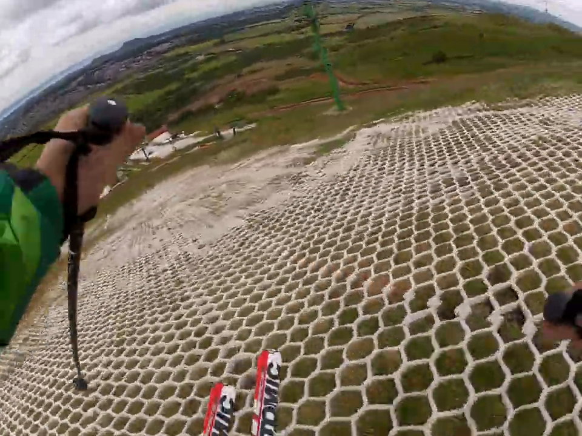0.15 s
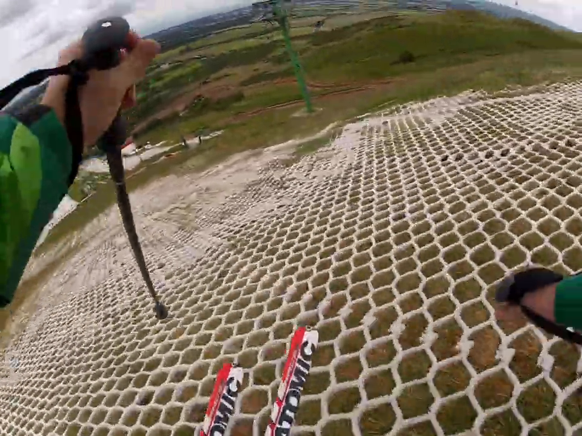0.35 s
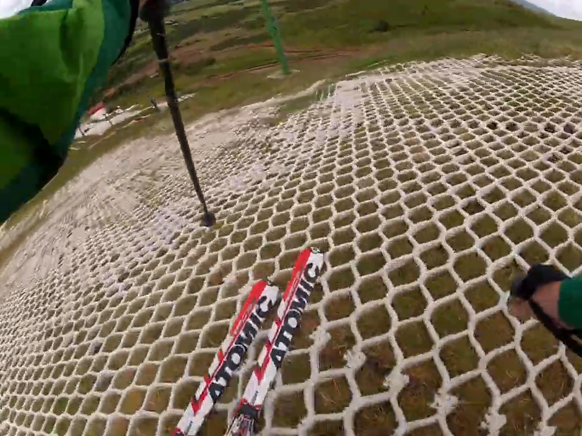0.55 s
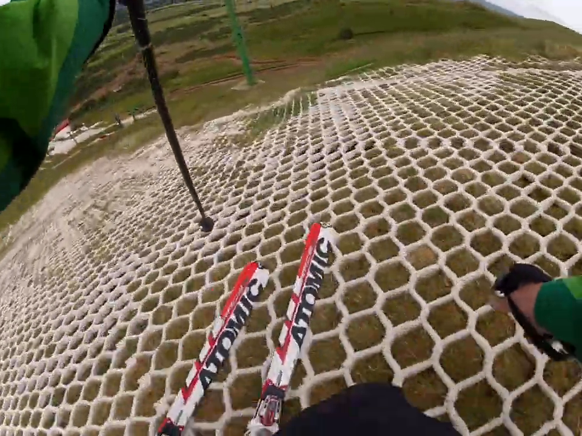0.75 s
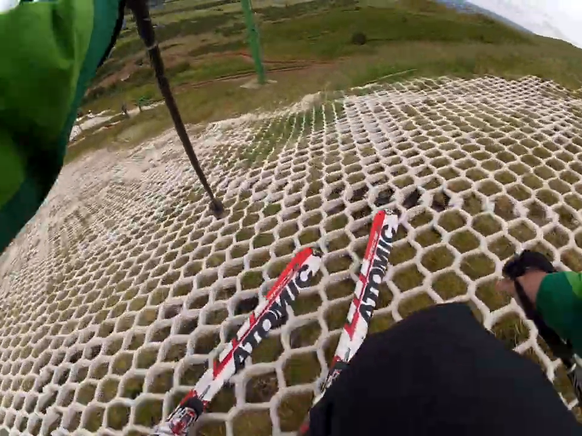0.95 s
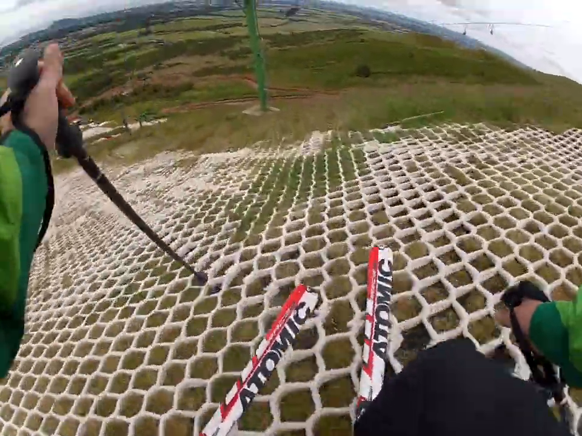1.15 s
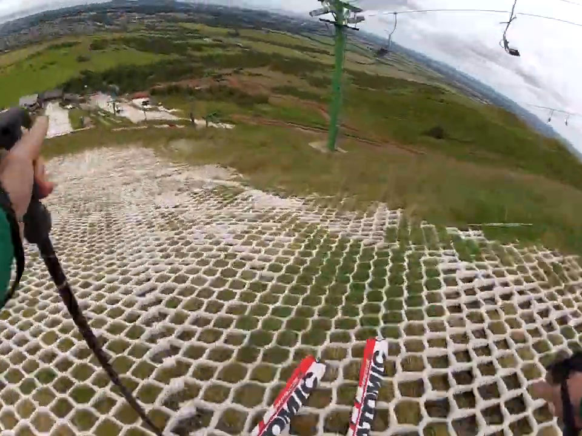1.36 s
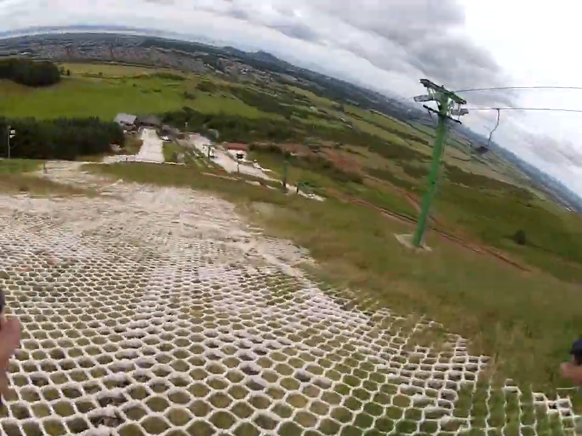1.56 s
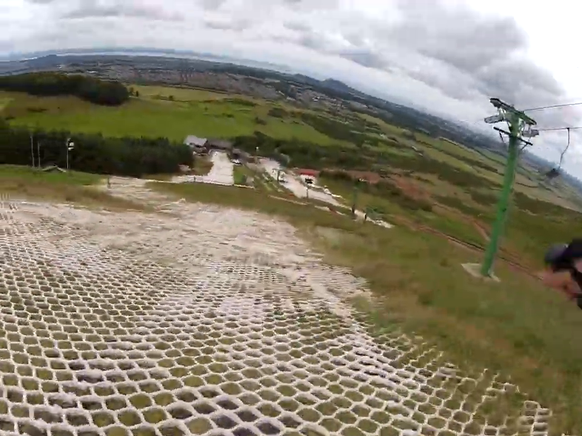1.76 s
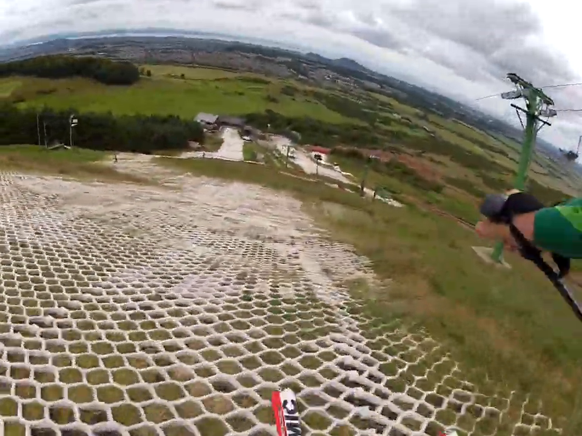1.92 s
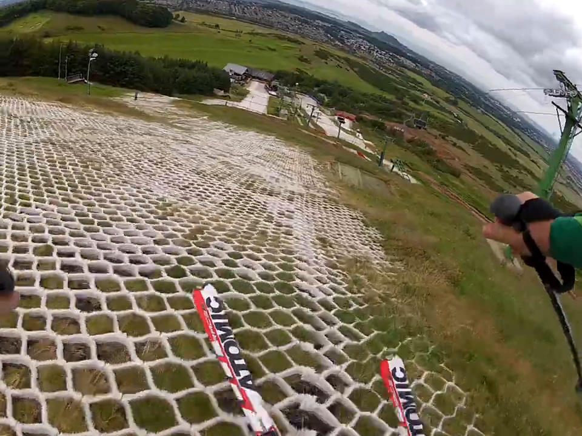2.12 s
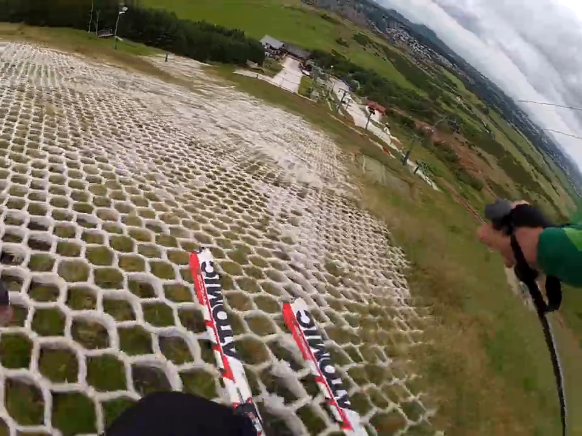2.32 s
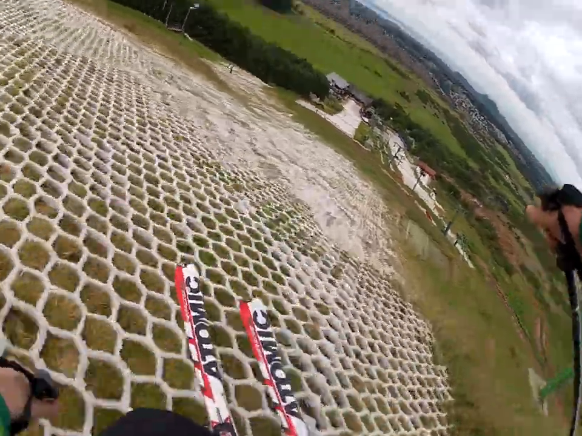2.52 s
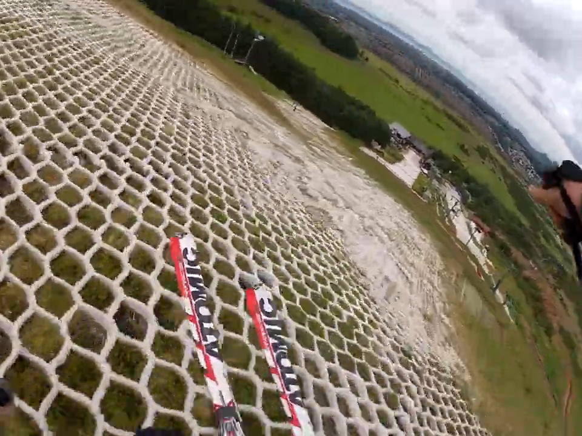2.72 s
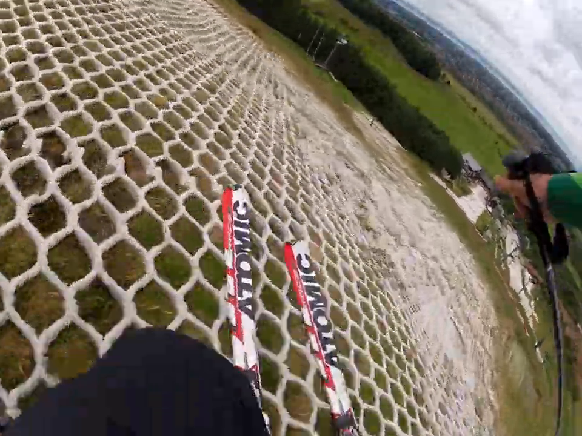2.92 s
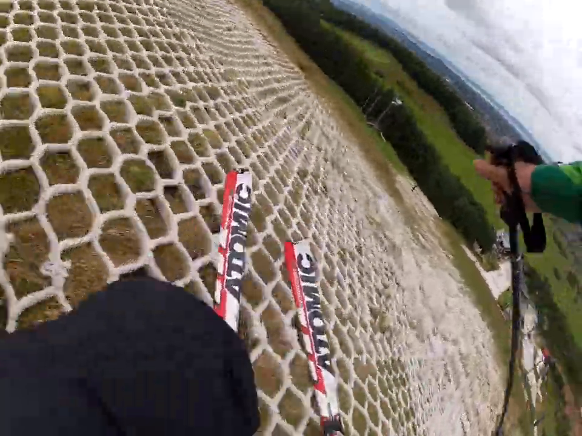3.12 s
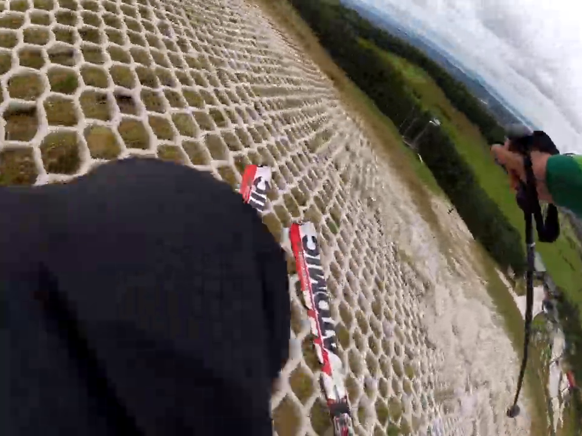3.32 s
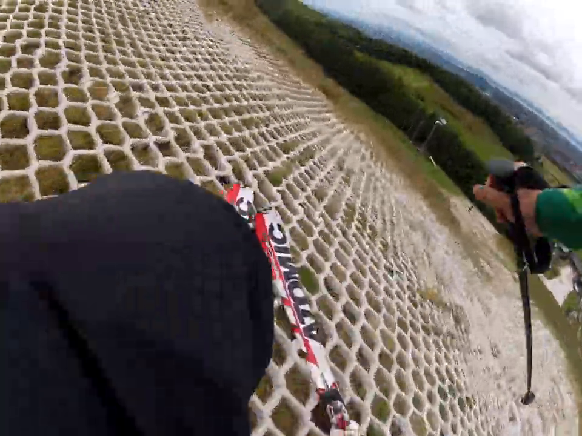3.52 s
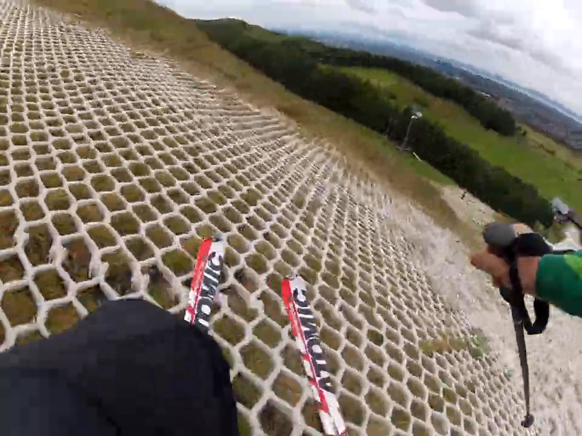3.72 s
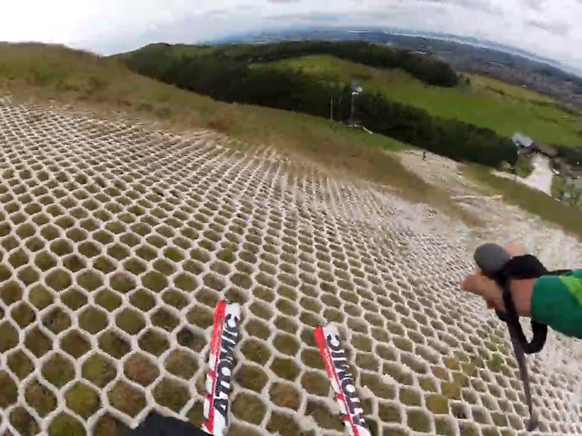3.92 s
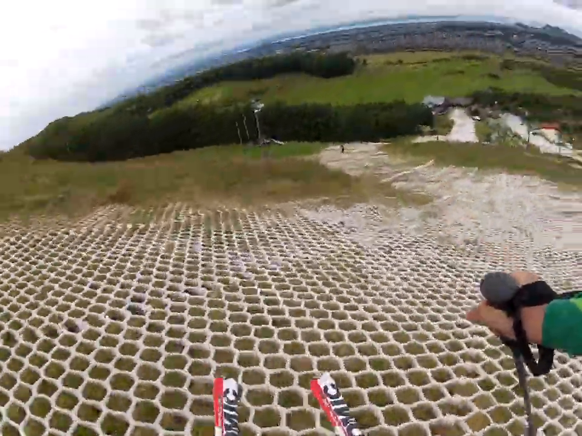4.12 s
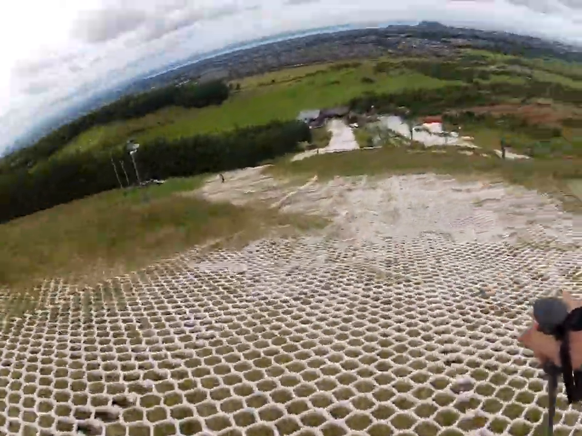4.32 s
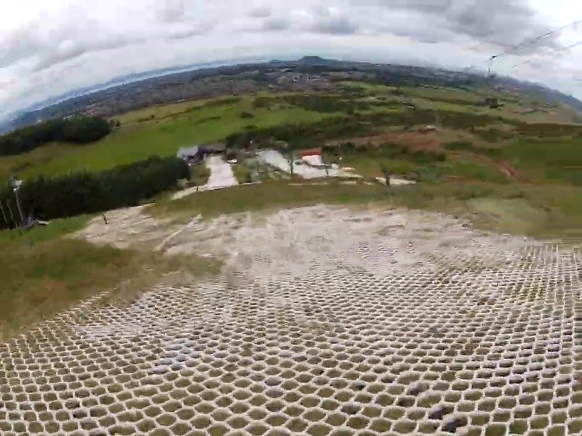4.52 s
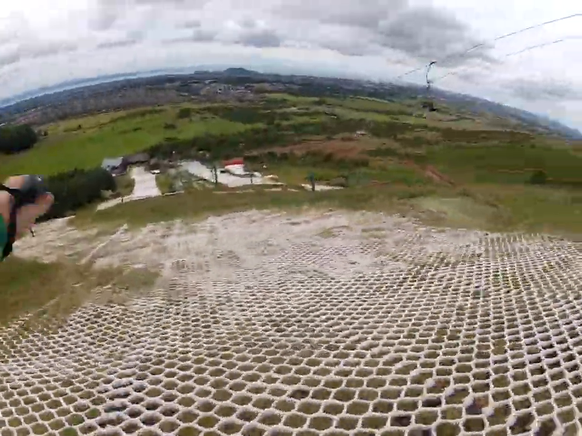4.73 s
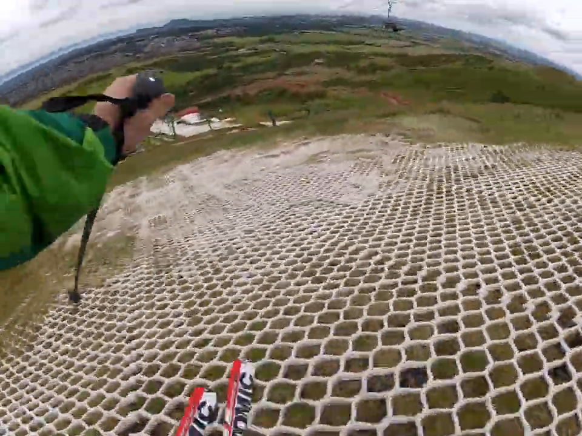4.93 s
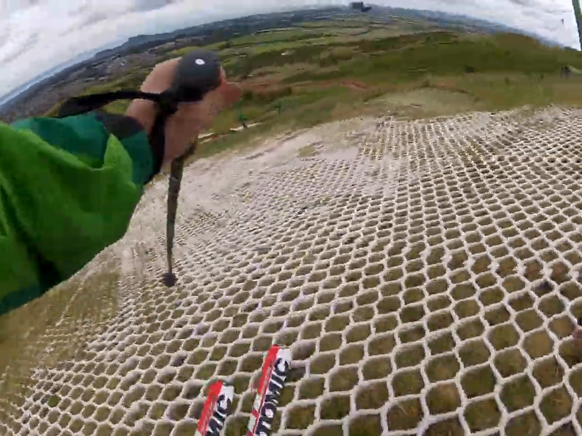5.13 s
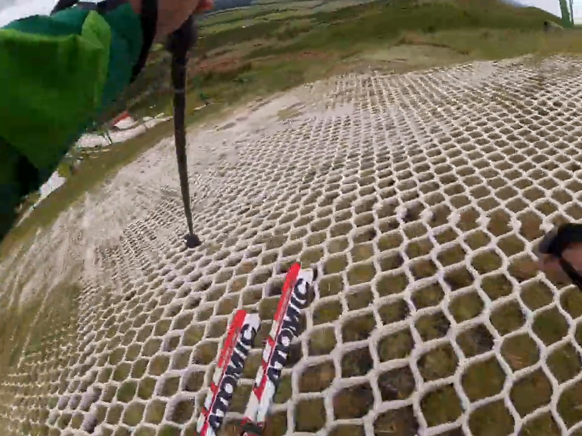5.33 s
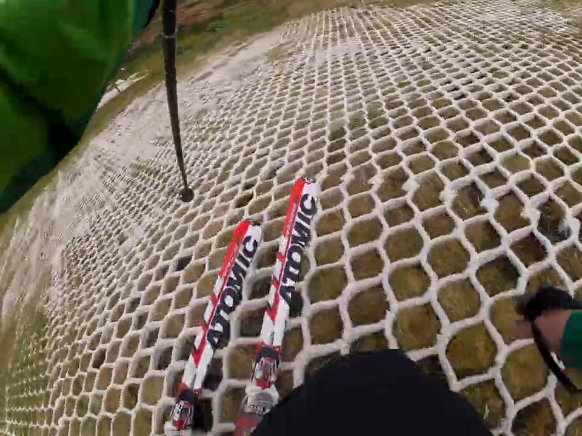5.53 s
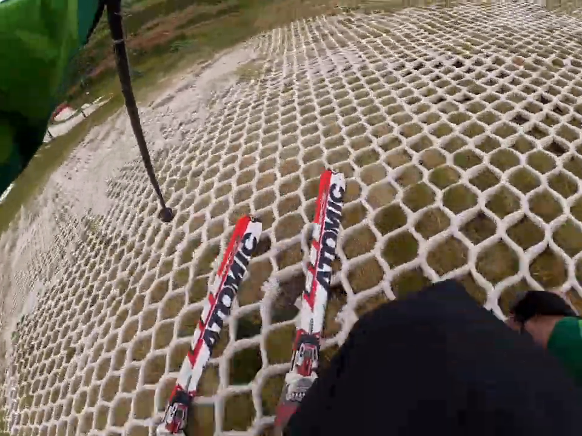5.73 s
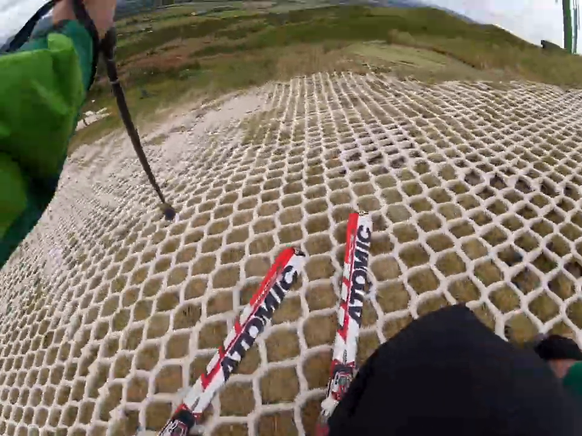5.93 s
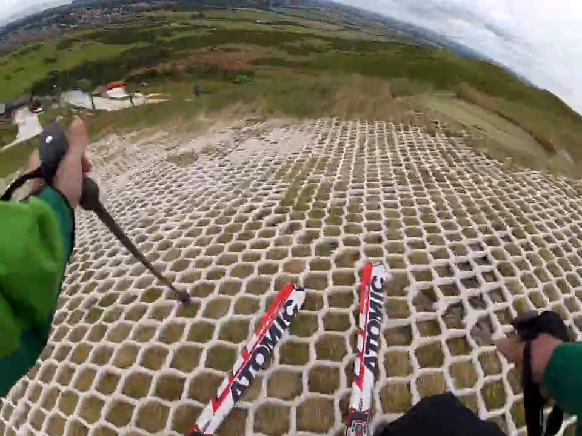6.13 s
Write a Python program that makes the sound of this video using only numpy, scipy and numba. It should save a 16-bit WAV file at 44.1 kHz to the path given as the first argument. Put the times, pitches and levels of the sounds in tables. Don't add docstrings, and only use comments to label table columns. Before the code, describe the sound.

Skis scrape and rasp down a bristly plastic slope, gritty and ringing, while wind buffets the enclosed microphone and occasional sharp knocks crack through.

```python
import sys
import numpy as np
from scipy import signal
from scipy.fft import rfft, irfft
from scipy.io import wavfile
from scipy.ndimage import uniform_filter1d
from numba import njit

SR = 44100
rng = np.random.default_rng(int(sys.argv[2]) if len(sys.argv) > 2 else 0)


def volts_from_decibels(level):
    exponent = np.asarray(level, float) / 20
    return 10 ** exponent


def waveform_to_disk(signal):
    frames = np.transpose(np.atleast_2d(signal))
    scaled = np.clip(frames, -1, 1) * 32767
    samples = np.round(scaled).astype(np.int16)
    wavfile.write(sys.argv[1], SR, samples)


N = 276066


def level(x):
    return x / np.sqrt(np.mean(x ** 2))


def ring(x, modes):
    total = 0
    for k, (hz, width_hz, level_db) in enumerate(modes):
        b, a = signal.iirpeak(hz, hz / width_hz, SR)
        total = total + (-1) ** k * volts_from_decibels(level_db) * signal.lfilter(b, a, x)
    return total


def colour(x, points):
    hz, db = np.transpose(points)
    f = np.fft.rfftfreq(len(x), 1 / SR) + 1
    gain = volts_from_decibels(np.interp(np.log(f), np.log(hz), db))
    return irfft(rfft(x) * gain, len(x))


def walk(rate_hz):
    hold = int(SR / rate_hz)
    steps = np.repeat(rng.standard_normal(N // hold + 1), hold)
    x = uniform_filter1d(uniform_filter1d(steps, hold), hold)[:N]
    return x / x.std()


def grains(rate_hz, spread_db):
    chance = rng.random((3, N))
    happens = chance[0] < rate_hz / SR
    sign = np.sign(chance[1] - 0.5)
    size = volts_from_decibels(spread_db * np.minimum(-np.log(1 - chance[2]), 4.0))
    return happens * sign * size


def curves(table):
    s, *columns = np.transpose(table)
    return [np.interp(np.arange(N) / SR, s, c) for c in columns]


def swells(table):
    t = np.arange(N) / SR
    return sum(db * np.exp(-(1000 * (t - s) / ms) ** 2) for s, db, ms in table)


# time_s [s], buffet_db [dB]
HEADWIND_CURVE = [(0.0, -24), (.3, -16), (.62, -25.5), (.95, -33), (1.1, -43.5), (1.7, -53.5), (1.9, -46),
                  (2.06, -31.5), (2.6, -28), (2.74, -20), (3.05, -29), (3.7, -27.5), (3.95, -38.5),
                  (4.4, -27.5), (4.65, -18), (5.07, -14), (5.7, -25), (6.26, -51)]
# centre_s [s], swell_db [dB], length_ms [ms]
WIND_PUFFS = [(.47, 2.5, 67), (.73, 8, 84), (.99, 5.5, 41), (1.17, 11, 50), (1.32, 10, 30), (1.53, 10, 59),
              (1.82, 6, 48), (2.2, -6, 74), (2.45, 1, 92), (2.58, -5, 20), (3.12, 8, 58), (3.28, 6.5, 81),
              (3.5, 9, 65), (3.7, 8, 26), (4.04, 9.5, 45), (4.18, 8.5, 40), (4.25, -8, 41), (4.31, 3, 25),
              (4.5, 5.5, 27), (4.55, -10, 13), (4.63, 5, 56), (4.74, -2.5, 25), (4.79, 3, 13),
              (5.2, -3, 57), (5.33, -1.5, 15), (5.4, 2.5, 14), (5.46, -3, 12), (5.5, 0.5, 19),
              (5.58, -6, 41), (5.64, 4, 31)]
# centre_s [s], swell_db [dB], length_ms [ms]
HELMET_LURCHES = [(.08, 9, 36), (.5, 5, 70), (.88, 11, 44), (1.45, 2, 110), (1.81, 13, 20), (2.26, 6, 30),
                  (2.47, -8, 60), (3.08, -10, 50), (3.27, 5, 41), (3.75, -5, 60), (4.18, -11, 40),
                  (4.37, -14, 62), (4.84, 6, 50), (5.2, 6, 60), (5.6, 10.5, 71)]
# frequency_hz [Hz], level_db [dB per Hz]
WIND_SPECTRUM = [(8.8, -38), (15, -27), (38, 4.5), (203, -2.5), (351, -8), (392, -10.5), (620, -16),
                 (802, -23), (1200, -34), (1560, -66), (2640, -120)]


def wind():
    buffet_db = curves(HEADWIND_CURVE)[0] + swells(WIND_PUFFS)
    deep_db = -7 - 0.38 * (buffet_db + 23.5) + swells(HELMET_LURCHES)
    gust_db = 0.66 * walk(14)
    slaps = level(grains(250, 3.4))
    buffeting = 0
    for hz in (125, 250, 500):
        flutter_db = 0.96 * walk(hz / 5)
        eddies = (0.61 * slaps + rng.standard_normal(N)) * volts_from_decibels(gust_db + flutter_db)
        band = [(hz / 2, -60), (hz / 1.764, -9), (hz, 0), (hz * 1.71, -9), (hz * 2, -60)]
        buffeting = buffeting + colour(eddies, band)
    buffeting = level(colour(buffeting, WIND_SPECTRUM))
    pushes = rng.standard_normal(N) * volts_from_decibels(gust_db)
    deep = level(colour(pushes, [(12, -34), (25, -2.5), (45, 2.5), (75, 1.5), (100, -7), (140, -54.0)]))
    return volts_from_decibels(buffet_db + 0.85) * (buffeting + volts_from_decibels(deep_db - 0.6) * deep)


# time_s [s], scrape_db (edge pressure) [dB], skid [0 carving - 1 flat and sideways],
# flex_db (board flex over scrape) [dB]
SKI_TURNS = [(0.0, -32, 0.54, -7), (.33, -37.5, 0.75, -7), (.66, -24, 0.26, -7), (.95, -31, 0.57, -0.5),
             (1.2, -26.5, 0, -6.5), (1.45, -38.5, 0.47, 0), (1.72, -47.5, 0.88, 2.5), (1.92, -46, .7, 5),
             (2.13, -33, 0.85, 1.5), (2.55, -35.5, 0.65, 3), (3.08, -25, 0.16, -4.5),
             (3.7, -26.5, 0.046, -4.5), (4.1, -42, .6, -2), (4.65, -42.5, 0.82, 14),
             (5.18, -28.5, 0.45, -1.5), (5.45, -28, 0.48, -2), (6.14, -34, 0.31, 0), (6.26, -45, .3, 0)]


def turns():
    return curves(SKI_TURNS)


# centre_s [s], swell_db (of the scrape) [dB], length_ms [ms]
EDGE_BITES = [(.44, 6, 38), (.51, 3.5, 11), (.608, -6, 12), (.635, 4, 7.4), (1.65, -12, 75), (1.89, 3, 4.5),
              (2.09, 2.5, 18), (2.19, 4, 14), (1.695, 1, 12), (2.28, -3, 50), (2.42, 4, 110),
              (2.84, 4, 130), (2.9, 2, 10), (2.97, -3, 61), (3.005, 7.5, 6.3), (3.116, 7, 10),
              (3.275, 8.5, 3.1), (3.572, 6, 15), (3.682, 6.5, 4.4), (4.215, 7, 5.9), (4.27, -6, 52),
              (4.32, 7, 13), (5.331, 5.5, 10), (5.385, 8.5, 17), (5.43, 3.5, 16), (5.505, 7.5, 9.2),
              (5.565, 6, 9.6), (5.6, -3, 11), (5.638, 4, 12), (5.7, -1, 27)]


def bites():
    return swells(EDGE_BITES)


# frequency_hz [Hz], width_hz [Hz], level_db [dB]
BOARD_MODES = [(400, 130, -2), (668, 157, -0.5), (313, 326, -1.5), (880, 350, -8)]


def boards():
    judder = level(grains(1500, 1.8)) + 0.99 * rng.standard_normal(N)
    judder = judder * volts_from_decibels(1.75 * walk(45))
    scrape_db, _, flex_db = turns()
    rumble = level(ring(ring(judder, BOARD_MODES), [(502, 1000, 0)]))
    return volts_from_decibels(scrape_db + flex_db + 0.21 * bites() - 1.0) * rumble


# start_s [s], peak_db [dB], ring_hz (case) [Hz], crack_db [dB over ring],
# thud_db [dB over ring]
POLE_KNOCKS = [(0.198, -11.5, 2840, -21, -17), (0.5814, 0.5, 3070, 2.5, -14), (.822, -9, 2900, -20, -28),
               (0.9637, -10.5, 2760, -10, -16), (1.7134, -18.5, 2850, -5, -5), (1.94, -12, 2650, -12, 5),
               (2.037, -16.5, 2860, 3, 7), (2.323, -10, 2690, -26, -16), (2.68, -11, 3300, -5, -8),
               (2.7136, -5.5, 3300, -4, 1), (2.8067, -4, 2520, -7, 11.5), (2.8585, -15, 2580, -14, 16.5),
               (4.6563, -17, 2830, -20, -10), (4.7212, -26, 2200, -18, 3), (5.4377, 1.5, 2660, -26.5, -22),
               (.012, -9, 2480, -24, -18), (1.438, -14, 2270, -15, -13)]


def knocks():
    length = 2048
    thud_rise_ms = 1.35
    out = np.zeros(N + length)
    t = np.arange(length) / SR
    for start_s, peak_db, hz, crack_db, thud_db in POLE_KNOCKS:
        noise = rng.standard_normal(length)
        rattle_ms = max(2.1 - 0.25 * thud_db, 0.8)
        rattle = noise * np.exp(-1000 * t / rattle_ms) * np.minimum(t / 0.00036, 1)
        case = ring(ring(rattle, [(hz, 300, 0), (2050, 500, -9), (1300, 400, -1)]), [(2540, 810, 0)])
        snap = rattle * np.exp(-t / 0.0015)
        crack = ring(ring(snap, [(4300, 1840, 0.44), (3300, 650, -1.6)]), [(4340, 1000, 0)])
        swing = 1000 * t / thud_rise_ms
        thud = np.sin(2 * np.pi * 540 * t + noise[0]) * swing * np.exp(1 - swing)
        case = case / np.abs(case).max()
        crack = crack / np.abs(crack).max()
        knock = case + volts_from_decibels(crack_db) * crack + volts_from_decibels(thud_db - 6.5) * thud
        i = int(start_s * SR)
        out[i:i + length] += volts_from_decibels(peak_db - 5.5) * knock
    return out[:N]


# frequency_hz [Hz], width_hz [Hz], level_db [dB]
CASE_MODES = [(1529, 66, -7.5), (1965, 64, 0), (2340, 64, 0), (2630, 68, 1), (2850, 175, -3.5),
              (3093, 93, -9)]
# frequency_hz [Hz], level_db [dB per Hz]
HISS_SPECTRUM = [(2600, -15.5), (3200, 0), (3450, -7), (3700, 0.5), (4300, -1), (4900, 0), (5300, -5.5),
                 (5900, -9), (7000, -20)]
# centre_s [s], swell_db [dB], length_ms [ms]
HOLLOW_DRAGS = [
    (.33, 7, 30),
    (2.3, 3.5, 160),
    (2.75, 9, 330),
    (3.4, 10.5, 380),
    (5.3, 3, 60),
    (5.6, 3, 74),
]


def bristles():
    scrape_db, skid, _ = turns()
    bites_db = bites()
    hiss_carve_db, hiss_skid_db = -11.5, 0
    hollow_carve_db, hollow_skid_db = -24.5, 1.5
    hiss_db = hiss_carve_db + skid * (hiss_skid_db - hiss_carve_db)
    hollow_db = hollow_carve_db + skid * (hollow_skid_db - hollow_carve_db) + swells(HOLLOW_DRAGS)

    cells = volts_from_decibels(0.66 * walk(30) + 0.96 * walk(90))
    flicks = cells * (level(grains(7000, 2.96)) + 0.37 * rng.standard_normal(N))
    edge = cells * (level(grains(4000, 1.6)) + 1.02 * rng.standard_normal(N))

    case = ring(ring(edge, [(2200, 940, -15)]), [(2200, 3550, 0)])
    for k, mode in enumerate(CASE_MODES):
        case = case + (-1) ** k * ring(flicks * volts_from_decibels(walk(24.79)), [mode])
    case = level(case)
    hiss = level(colour(edge * volts_from_decibels(0.66 * walk(40)), HISS_SPECTRUM))
    hollow = level(ring(ring(edge, [(1430, 840, 0)]), [(1270, 5600, 0)]))
    hiss = volts_from_decibels(hiss_db - 0.26 * bites_db + 1.0) * hiss
    hollow = volts_from_decibels(hollow_db - 4.0) * hollow
    return volts_from_decibels(scrape_db + bites_db + 1.38) * (case + hiss + hollow)


def scene():
    mono = wind() + boards() + knocks() + bristles()
    return np.array([mono, mono])


@njit
def follow(x, attack, release):
    e, out = 0., np.empty(len(x))
    for i in range(len(x)):
        e += (abs(x[i]) - e) * (attack if abs(x[i]) > e else release)
        out[i] = e
    return out


def low_pass(x):
    return signal.sosfilt(signal.butter(12, 16320, fs=SR, output="sos"), x)


def record(dry):
    slow_rate, hold = 12000, 4
    gain_lag = 200
    bright = ring(dry[0], [(4400, 1840, 0)])
    duck = np.minimum(1, 0.062 / (follow(bright, 0.04, 0.0023) + 1e-9)) ** 0.78
    late = np.concatenate([np.ones(gain_lag), duck])[:N]
    heard = 0.89 * np.tanh(dry[0] * late / 0.82)
    slow = signal.resample_poly(heard, slow_rate // 300, SR // 300)
    held = signal.resample_poly(np.repeat(slow, hold), SR // 300, hold * slow_rate // 300)[:N]
    held = signal.sosfilt(signal.ellip(12, 0.2, 75, 15250, fs=SR, output="sos"), held)
    return low_pass(np.array([held, held]))


dry = scene()
out = record(dry)
waveform_to_disk(out)
```